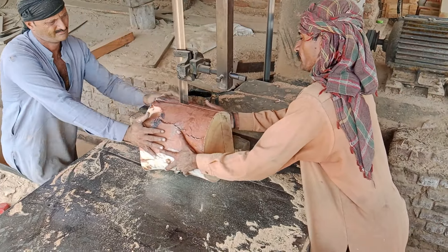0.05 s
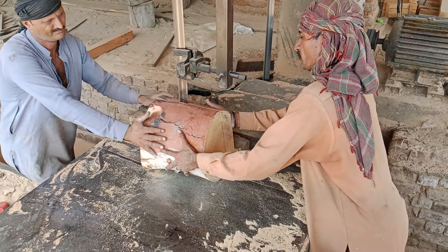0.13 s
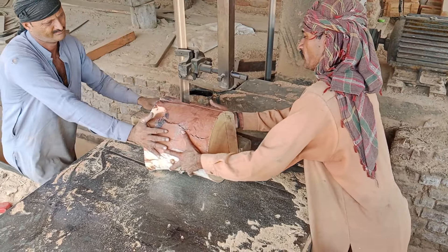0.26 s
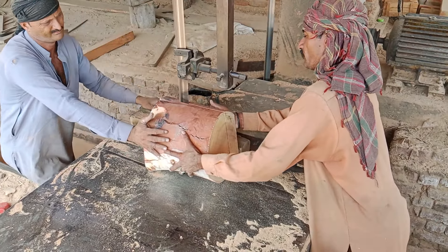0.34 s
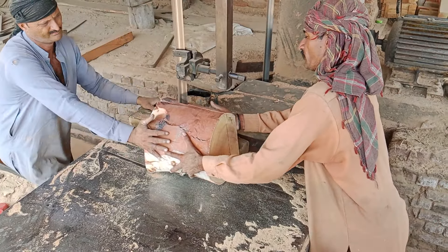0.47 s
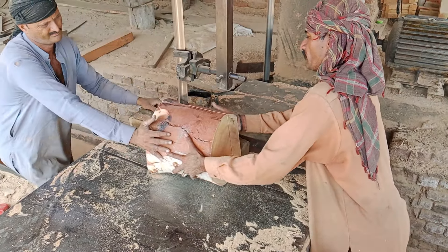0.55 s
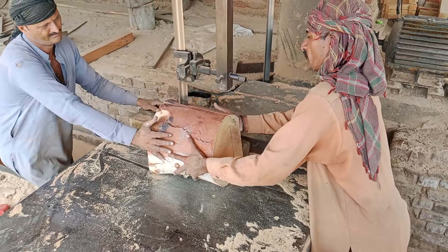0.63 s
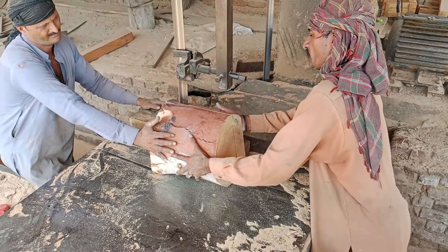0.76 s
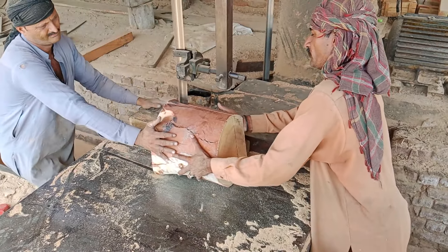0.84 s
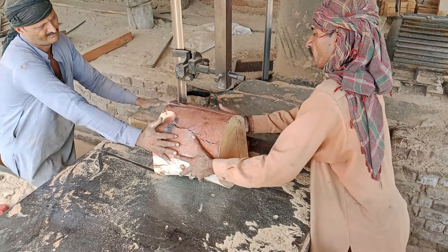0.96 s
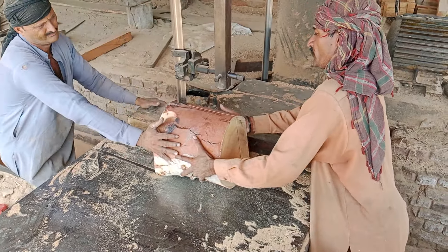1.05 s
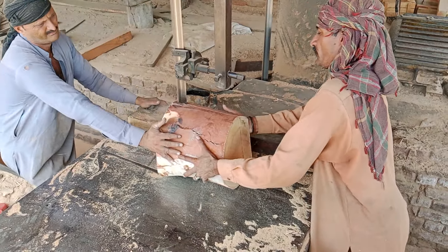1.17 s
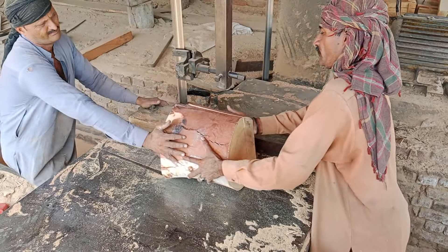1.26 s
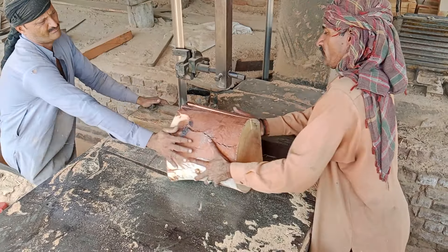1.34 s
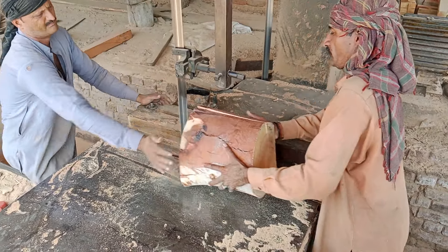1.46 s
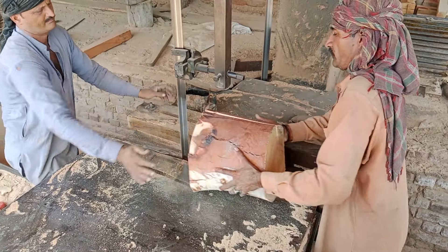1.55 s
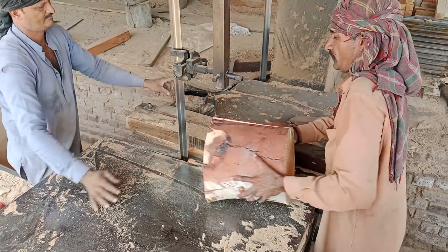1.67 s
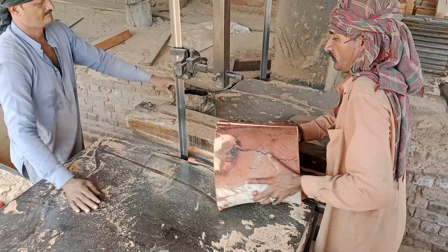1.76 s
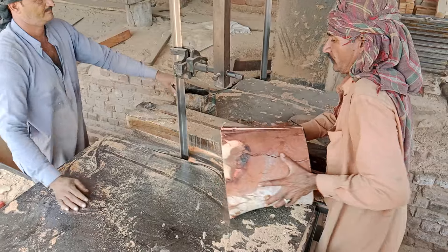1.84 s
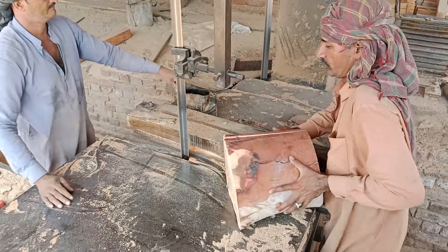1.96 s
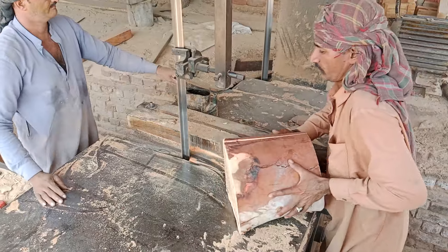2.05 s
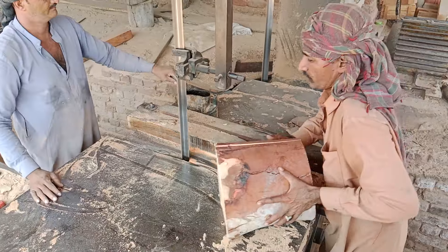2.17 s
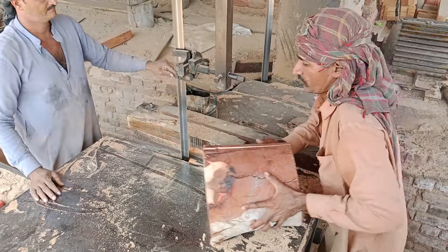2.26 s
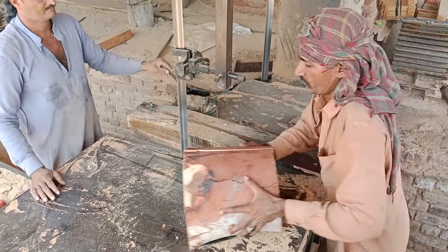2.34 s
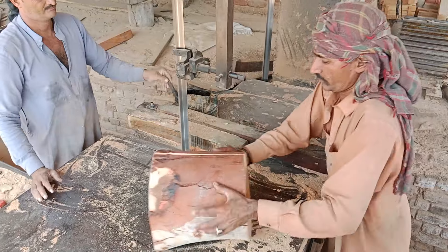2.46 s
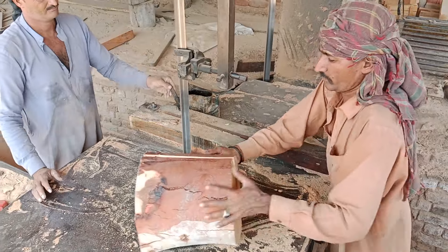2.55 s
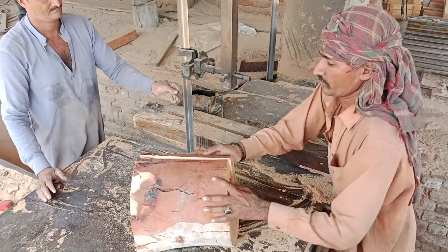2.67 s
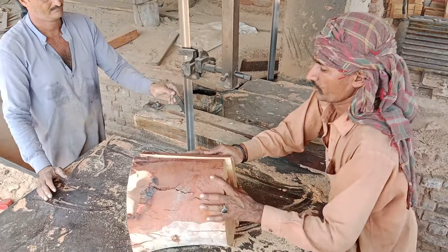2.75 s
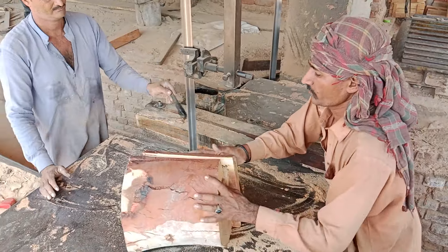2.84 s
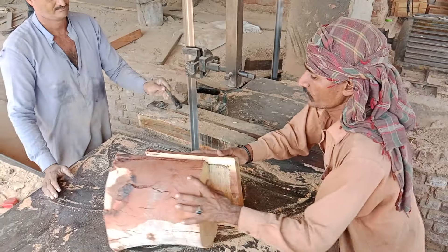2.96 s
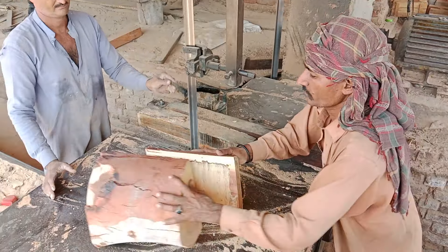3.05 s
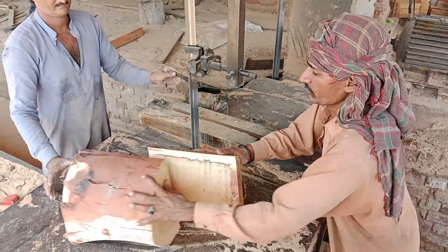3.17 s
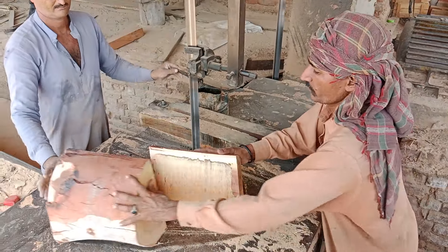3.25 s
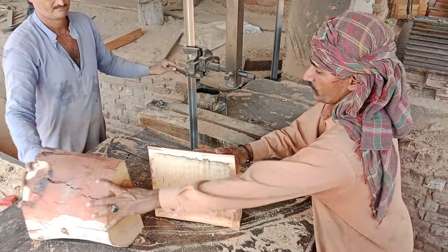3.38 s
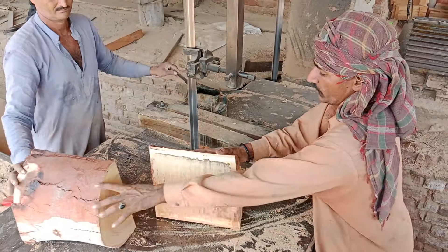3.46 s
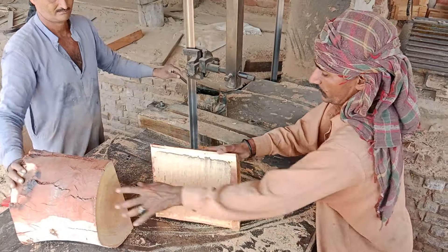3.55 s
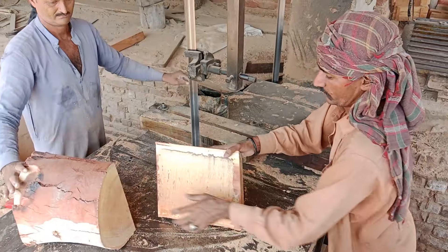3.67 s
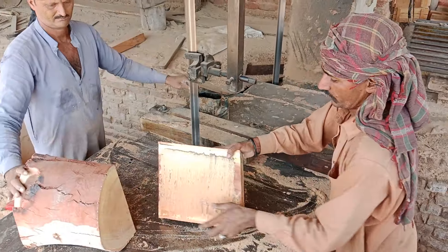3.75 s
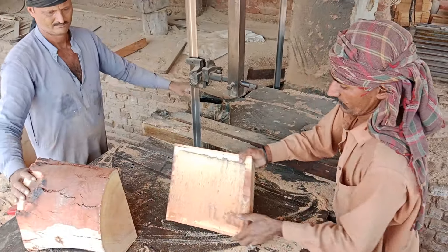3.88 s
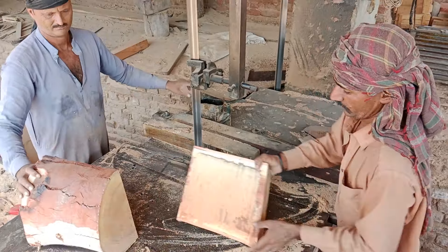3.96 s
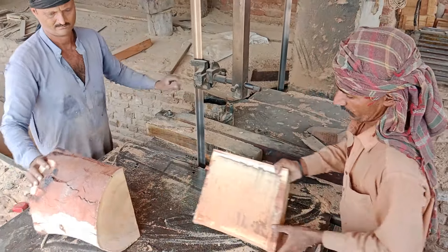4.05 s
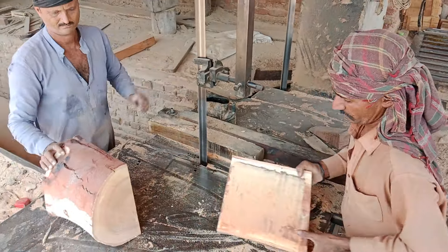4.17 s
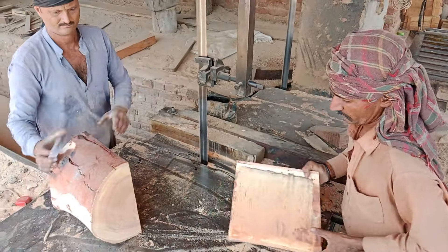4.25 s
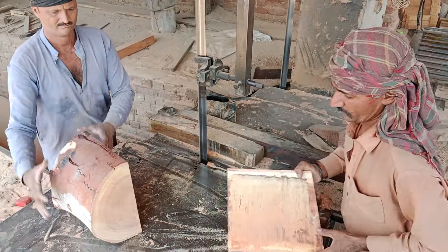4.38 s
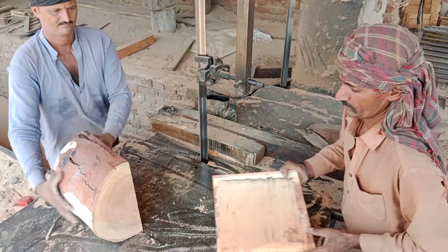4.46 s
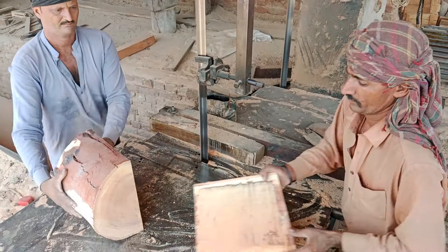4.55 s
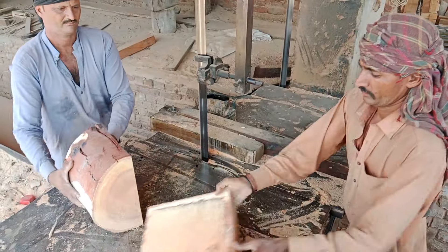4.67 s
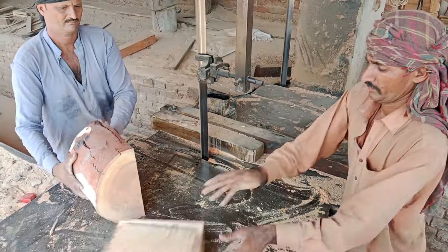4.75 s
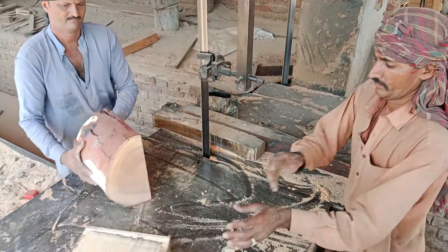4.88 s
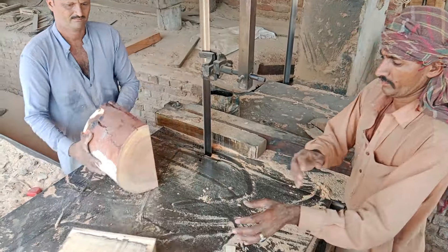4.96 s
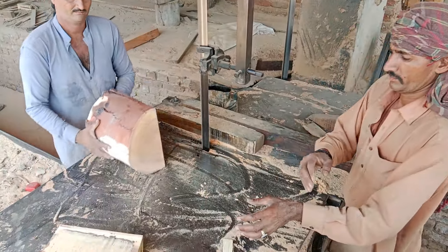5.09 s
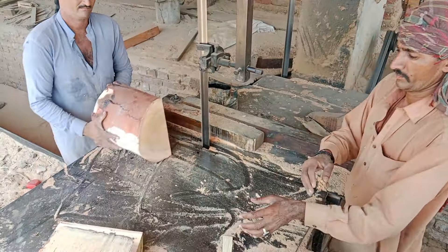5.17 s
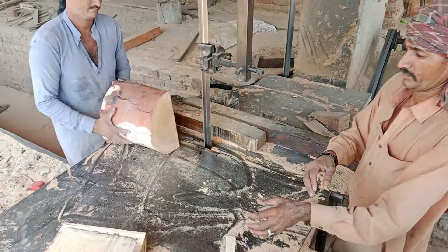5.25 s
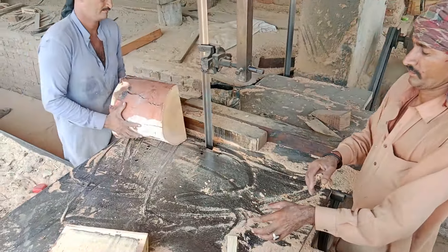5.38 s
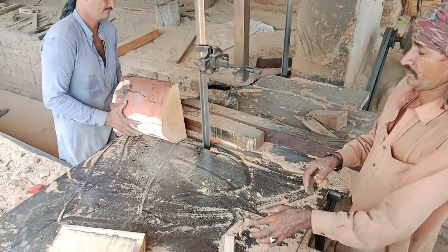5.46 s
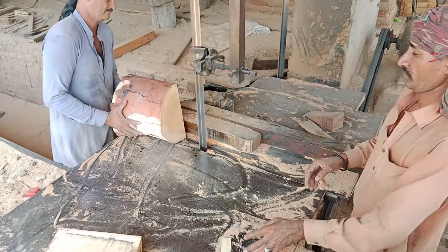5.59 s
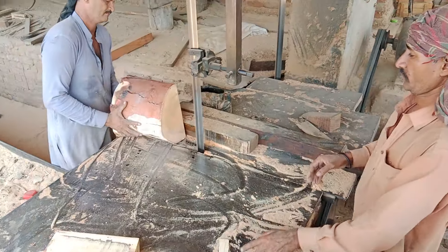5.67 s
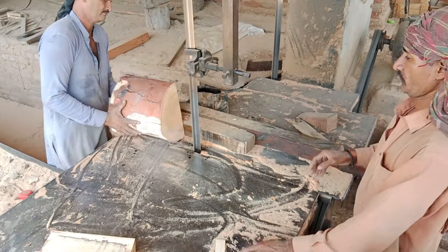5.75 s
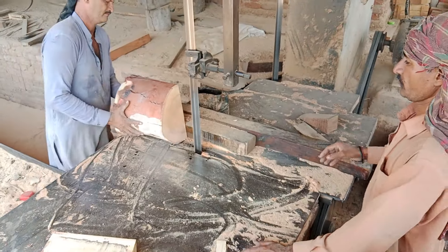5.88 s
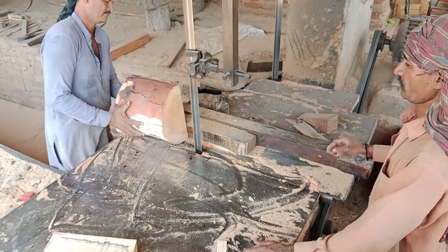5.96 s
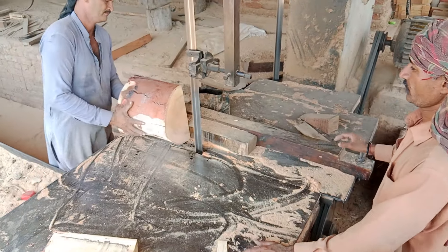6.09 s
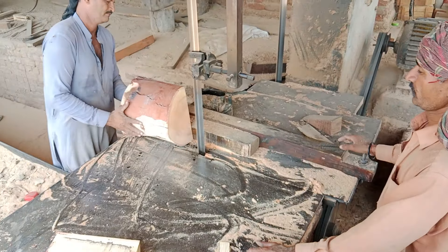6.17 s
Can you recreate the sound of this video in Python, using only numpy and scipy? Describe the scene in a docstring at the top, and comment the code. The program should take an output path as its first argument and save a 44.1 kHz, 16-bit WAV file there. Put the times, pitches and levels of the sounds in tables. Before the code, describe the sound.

From the start a large band saw cuts through a log, with a bright rasp and a high whine that sinks slightly in pitch and is strongest just before 1 second. At about 1.3 seconds the wood knocks lightly twice on the saw table and the rasp stops abruptly as the blade breaks out. The saw speeds up a little and runs free to the end, at about 6 seconds: a steady, high metallic hiss with thin, fluttering ringing, over a soft wheel roar and an uneven low rumble. A fine crunch of sawdust comes in around 1.8 seconds and slowly fades. At about 4.8 seconds a wooden slab drops close to the microphone with a quick clatter of several knocks, the loudest sound, briefly distorting and settling by 5 seconds. The hard walls of the workshop add a short, tight echo.

```python
"""A big band saw rips a slab off a hand-fed log, its teeth whining and rasping as the load slows it.
At 1.3 s the blade breaks out and wood knocks on the saw table. The band speeds up and runs free,
hissing through its guides, crunching sawdust and ringing in its cross modes over the rumble of frame
and wheels. At 4.8 s the slab is dropped near the microphone and overloads it.
A hard-walled workshop surrounds it all."""
import sys
import numpy as np
from scipy import signal
from scipy.fft import rfft, irfft
from scipy.io import wavfile
from scipy.ndimage import map_coordinates

SR = 44100
rng = np.random.default_rng(int(sys.argv[2]) if len(sys.argv) > 2 else 0)


def file_out(sig):
    """Save sig as 16-bit WAV at sys.argv[1]."""
    # one column per channel
    cols = np.atleast_2d(sig).T
    # limit, then scale
    lim = np.clip(cols, -1, 1)
    pcm = np.round(lim * 32767).astype(np.int16)
    wavfile.write(sys.argv[1], SR, pcm)


N = 274302
TIME = np.arange(N) / SR
FREQ = np.maximum(np.arange(N // 2 + 1) * SR / N, 1)

# Band rubbing in its guides. Each row: time in seconds, level in dB.
RUB_LEVEL = [(0, -24.5), (1.3, -22.5), (1.8, -21.5), (2.2, -20.5), (3.1, -22), (4.5, -21.5), (6.2, -20.5)]
# Guide hiss. Each row: frequency in Hz, relative level in dB.
RUB_SPECTRUM = [(1200, -42), (1800, -20.5), (2100, -13), (2350, -18.5), (3000, -13.5), (3700, -11),
                (4200, -8.5), (5300, -3.5), (6400, -1), (7200, -4), (7900, -15), (10500, -31.5),
                (12200, -29.5), (14200, -16.5), (15700, -23)]
# Upper cross modes. Each row: cut-on in Hz, edge width in Hz, tail width in Hz, relative level in dB.
UPPER_CROSS_MODES = [(6706, 22, 380, 9), (12440, 65, 1200, -15.5)]

def guide_rub(tooth_hz):
    """The band scrapes through its guides, pressed a little harder once per wheel turn."""
    teeth_per_turn = 222
    turn = np.sin(2 * np.pi * np.cumsum(tooth_hz / teeth_per_turn) / SR)
    # Out of the log, the slack band takes a moment to bear on its guides again.
    slack_db = -3 * (TIME > EXIT_S) * bump(EXIT_S, half_s=0.12)
    level_db = curve(RUB_LEVEL)[0] + slack_db + 0.28 * walk(11)
    hiss = noise() * undb(.5 * turn + 0.6 * walk(32) + 1.0 * walk(1200))
    scrape = noise() * undb(0.21 * turn + 1.1 * walk(40))
    modes = sum(cross_mode(*mode) for mode in UPPER_CROSS_MODES)
    steel = irfft(rfft(hiss) * colour(RUB_SPECTRUM) + rfft(scrape) * modes, N)
    return undb(level_db) * unit(steel)

# Lowest cross mode. One row: cut-on in Hz, edge width in Hz, tail width in Hz, relative level in dB.
SING_MODE = (2526, 16, 188, 0)
# Its strength. Each row: time in seconds, level in dB.
SING_LEVEL = [(0, -36.5), (1.0, -37), (1.6, -34.3), (2.9, -34.5), (3.6, -35), (4.3, -36), (5.4, -32.5),
              (6.2, -36)]
# Its flare-ups. Each row: peak time in seconds, gain in dB, half length in seconds.
SING_FLARES = [(1.777, 4, 0.018), (2.463, 2, 0.023), (2.816, 8, .02), (3.145, 3.5, .03), (3.853, 4, .02),
               (5.46, 3.5, 0.034)]

def band_sing():
    """The steel band rings in its lowest cross mode, fluttering and flaring up."""
    flares_db = sum(db * bump(peak_s, half_s) for peak_s, db, half_s in SING_FLARES)
    level_db = curve(SING_LEVEL)[0] + .9 * walk(7.6) + flares_db
    return undb(level_db) * shaped(noise(), cross_mode(*SING_MODE))

# Passing teeth. Each row: time in seconds, tooth rate in Hz, whine level in dB.
TOOTH_TRACK = [(0, 2340, -48), (.25, 2318, -49), (.5, 2282, -45), (.68, 2265, -37), (.88, 2243, -34),
               (1.0, 2223, -42), (1.15, 2183, -44), (1.31, 2210, -42), (1.6, 2330, -50), (2.2, 2440, -50)]
# Lines from teeth set in fours. Each row: frequency in quarters of the tooth rate, level in dB.
TOOTH_LINES = [(8, -39), (9, -39), (10, -39), (11, -30.5), (12, -30), (13, -41), (20, -53), (23, -42),
               (24, -38), (25, -52), (27, -40)]
# How hard the teeth bite. Each row: time in seconds, gain on the whole cut in dB.
BITE_GAIN = [(0, -3), (.3, -2), (.47, -0.3), (.57, -1.5), (.9, -0.5), (1.15, -3), (1.29, 0.5)]
# Tearing fibres. Each row: frequency in Hz, relative level in dB.
RASP_SPECTRUM = [(1200, -24.5), (3000, -12), (4500, -7), (5700, 1), (6550, 2.5), (6900, 13), (7250, 7),
                 (7800, -7.5), (9000, -17), (10500, -26), (12200, -17), (12700, -10), (13700, 3.5),
                 (15700, -8.5)]
# Log resonances. Each row: frequency in Hz, width in Hz, relative level in dB.
LOG_MODES = [(545.7, 15, 0.5), (660, 7.9, 1.5), (752, 9.7, 2), (910, 17, -2), (1033, 20, -0.5),
             (1097, 24, -3.5)]
EXIT_S, RELEASE_DB_PER_S = 1.312, 1100  # the blade breaks out of the log

def cut(tooth_hz, whine_db):
    """Teeth strike the wood in a whine, tear fibres in a bright rasp and shake the log."""
    bite = undb(curve(BITE_GAIN)[0] - RELEASE_DB_PER_S * np.clip(TIME - EXIT_S, 0, 1))
    # Unevenness repeats every dozen teeth: faint lines that sink with the band's speed.
    pattern = rng.standard_normal(228)
    travel_samples = np.cumsum(tooth_hz) / tooth_hz[0] + 0.84 * walk(40)
    uneven = map_coordinates(pattern, [travel_samples], order=3, mode="grid-wrap")
    tearing = (noise() + 0.45 * uneven) * undb(1.0 * walk(20) + 1.7 * walk(700))
    rasp = undb(-19.5) * shaped(tearing, colour(RASP_SPECTRUM))
    whine = undb(whine_db) * tone(tooth_hz, rough=0.32)
    # Timing jitter blurs the high lines most.
    overtones = sum(undb(db) * tone(round(k) * tooth_hz / 4, rough=k / 18) for k, db in TOOTH_LINES)
    # Slower beats of the tooth pattern sweep through the log's resonances.
    beats = tone(tooth_hz / 2, rough=.4) + tone(tooth_hz / 3, rough=.4)
    log = undb(-34) * shaped(noise() + 0.018 * beats, resonances(LOG_MODES))
    return bite * (rasp + whine + overtones + log)

# Wood striking the table. Each row: start in seconds, relative level in dB, contact time in ms.
BLOWS = [(1.262, -13, 2.4), (1.307, -16, 1.5), (4.799, 2, 2.6), (4.8565, 5.5, 0.31), (4.863, 1, 0.76),
         (4.869, 11.5, 4.2), (4.958, 3, 3.4), (5.0, -9, 4.6)]
# Slab and table together. Each row: frequency in Hz, relative level in dB, T60 in seconds.
SLAB_TABLE_MODES = [(132, -13, 0.21), (167.3, -3.5, 0.144), (192.3, -2, 0.09), (247, -5.5, 0.093),
                    (321.5, -4, 0.11), (436.5, -16, .08), (519, -8, 0.075), (643, -2, 0.038),
                    (740, -10.5, 0.1), (840, 4, 0.049), (910, -7, 0.1), (1045, -15, 0.079),
                    (1170, -18, .08), (1900, -28, 0.021), (2470, -6, 0.033)]

def knocks():
    """Each blow rings slab and table; a longer contact gives a duller thud."""
    out, t = np.zeros(N + SR), TIME[:SR // 2]
    hz, mode_db, t60_s = np.transpose(SLAB_TABLE_MODES)[:, :, None]
    crack_t60_s, clack_t60_s = 0.0093, 0.066
    crowded_modes = noise_band(hz=740, width_hz=256)
    scatters_db = 4.1 * rng.standard_normal((len(BLOWS), len(SLAB_TABLE_MODES), 1))
    for (start_s, db, contact_ms), scatter_db in zip(BLOWS, scatters_db):
        start = int(start_s * SR)
        span = slice(start, start + len(t))
        # Cosines: pressure follows the wood's acceleration, so it carries no net push.
        ring = np.sum(undb(mode_db + scatter_db - 60 * t / t60_s) * np.cos(2 * np.pi * hz * t), axis=0)
        crack = undb(14.5 - 60 * t / crack_t60_s) * noise()[:len(t)]
        clack = undb(10.5 - 60 * t / clack_t60_s) * crowded_modes[span]
        force = np.exp(-.5 * ((t[:600] * 1000 - contact_ms) / (contact_ms / 4)) ** 2)
        blow = signal.fftconvolve(ring + crack + clack, force / force.sum())[:len(t)]
        out[span] += undb(db - 18.5) * blow
    return out[:N]

# Passing notes. Each row: start and end in seconds, frequency in Hz, level in dB, roughness 0-1.
RING_NOTES = [(0.23, 0.623, 655, -35.5, 0.3), (0.764, .9, 5070, -36.5, 0.4), (1.037, 1.193, 1097, -32, 0.4),
              (0.948, 1.44, 2753, -34.5, 0.66), (1.22, 1.54, 620, -44, 0.3), (1.4, 2.26, 1000, -46, 0.4),
              (2.73, 3.84, 587, -41.5, 0.74), (3.7, 5.7, 741, -43.5, 0.85)]

def rings():
    """Steel and wood take up single notes that swell, flutter and die away."""
    out = np.zeros(N)
    for start_s, end_s, hz, db, rough in RING_NOTES:
        swell = np.sin(np.pi * np.clip((TIME - start_s) / (end_s - start_s), 0, 1))
        out += undb(db) * swell * tone(np.full(N, hz), rough)
    return out

# Sawdust crunch. Each row: time in seconds, level in dB.
DUST_LEVEL = [(1.4, -55), (1.8, -35), (2.3, -37.5), (3.3, -39.5), (3.8, -44), (4.5, -39.5), (5.4, -43),
              (6.2, -48)]

def sawdust():
    """Grains carried round by the band are crushed in the guides in uneven spurts."""
    grains = noise() * undb(2.9 * walk(17) + 2.0 * walk(900))
    return undb(curve(DUST_LEVEL)[0]) * shaped(grains, resonances([(14330, 1600, 0)]) ** 2)

# Wheel roar. Each row: frequency in Hz, relative level in dB.
WHEEL_SPECTRUM = [(100, -22), (390, -30), (470, -6.5), (600, -1.5), (800, -1), (900, 1.5), (1080, -5.5),
                  (1200, -12.5), (1500, -9), (1750, -4.5), (2400, -18.5), (5000, -52)]
# Housing resonances. Each row: frequency in Hz, width in Hz, relative level in dB.
HOUSING_MODES = [(580, 34, -9.5), (627, 31, -4), (758, 33, -4.5), (849.3, 10, 9.5), (890, 10.5, 7),
                 (1064, 30, 1), (1786, 24, -10)]

def wheels():
    """The wheels roar and ring their housing, where a low, breathy moan waxes and wanes."""
    roar = undb(-36.5 + 1.5 * walk(32)) * shaped(noise(), colour(WHEEL_SPECTRUM))
    moan_peak_s, moan_period_s = 1.97, 1.105
    moan_db = -60 + 8 * np.cos(2 * np.pi * (TIME - moan_peak_s) / moan_period_s)
    moan = undb(moan_db) * noise_band(hz=385.6, width_hz=81)
    housing = undb(-41.5) * shaped(noise(), resonances(HOUSING_MODES))
    return roar + moan + housing

# Frame rumble. Each row: frequency in Hz, relative level in dB.
FRAME_SPECTRUM = [(25, -26), (45, -13), (70, -15), (110, -8), (135, -2), (175, 1.5), (215, -6), (255, -4.5),
                  (280, -4.5), (320, -7.5), (360, -29), (600, -54)]
# Its swells. Each row: peak time in seconds, level in dB.
FRAME_SWELLS = [(.14, -43.5), (.27, -41.5), (.85, -45), (1.59, -42), (1.85, -44), (2.409, -48),
                (2.929, -39.5), (3.24, -44), (3.36, -40), (3.56, -45), (3.74, -39), (4.04, -41), (4.4, -42),
                (4.7, -42), (5.92, -45), (6.08, -49)]

def frame_rumble():
    """The frame throbs and shakes unevenly, swelling as the wood is shifted about."""
    throb_hz, throb_peak_s, rise_db_per_s = 2.23, 0.25, 1.34
    throb_db = 0.5 * np.cos(2 * np.pi * throb_hz * (TIME - throb_peak_s))
    idle = undb(-57.5 + rise_db_per_s * TIME + throb_db + 4 * walk(8))
    swells = sum(undb(db) * bump(peak_s, half_s=0.056) for peak_s, db in FRAME_SWELLS)
    return np.hypot(idle, swells) * shaped(noise(), colour(FRAME_SPECTRUM))

# Saw table resonances, applied twice. Each row: frequency in Hz, width in Hz, relative gain in dB.
DRONE_RESONANCES = [(225.5, 57, 0.5), (307.5, 23, -4)]
# Table drone. Each row: time in seconds, level in dB.
DRONE_LEVEL = [(0, -58), (.6, -64), (1.4, -44.5), (2.1, -55.5), (2.6, -54), (4.1, -50.5), (5.45, -48),
               (6.2, -51.5)]

def table_drone():
    """The saw table resonates with a hollow drone."""
    return undb(curve(DRONE_LEVEL)[0]) * shaped(noise(), resonances(DRONE_RESONANCES) ** 2)

def workshop(x, t60_s, wet_db):
    """Direct sound and a short, dense echo from the walls."""
    t = TIME[:SR]
    tail = rng.standard_normal(SR) * undb(-60 * t / t60_s) * (t > .006)
    return x + undb(wet_db) * signal.fftconvolve(x, tail / np.linalg.norm(tail))[:N]

def cross_mode(hz, edge_hz, tail_hz, db):
    """A long strip has no waves below a mode's cut-on and a crowd of them just above."""
    edge = (1 + np.tanh((FREQ - hz) / (2 * edge_hz))) / 2
    tail = np.exp(-np.maximum(FREQ - hz, 0) / tail_hz)
    return undb(db) * edge * tail

def resonances(modes):
    """Response of a few damped resonances."""
    return sum(undb(db) / (1 + 1j * (FREQ / hz - hz / FREQ) * hz / width) for hz, width, db in modes)

def colour(points):
    """Gain at every frequency from (Hz, dB) points."""
    hz, db = np.transpose(points)
    return undb(np.interp(np.log(FREQ), np.log(hz), db))

def shaped(x, response):
    """Filter by a response; rms 1."""
    return unit(irfft(rfft(x) * response, N))

def tone(hz, rough):
    """A line of rms near 1 whose phase and strength flutter."""
    phase = 2 * np.pi * np.cumsum(hz) / SR + rough * walk(48)
    return np.sqrt(2) * np.sin(phase) * (1 + .5 * rough * walk(33))

def noise():
    """White noise."""
    return rng.standard_normal(N)

def noise_band(hz, width_hz):
    """Noise passed twice through one resonance; rms 1."""
    return shaped(noise(), resonances([(hz, width_hz, 0)]) ** 2)

def walk(rate_hz):
    """Smooth random wander; rms 1."""
    return shaped(noise(), np.exp(-(FREQ / rate_hz) ** 2))

def curve(rows):
    """One signal for each column after the time column."""
    times_s, *columns = np.transpose(rows)
    return [np.interp(TIME, times_s, column) for column in columns]

def bump(peak_s, half_s):
    """A smooth rise and fall."""
    return np.exp(-((TIME - peak_s) / half_s) ** 2)

def undb(db):
    """Decibels to gain."""
    return 10 ** (np.asarray(db) / 20)

def unit(x):
    """Scale to rms 1."""
    return x / np.sqrt(np.mean(x ** 2))

def scene():
    """Saw and wood in the workshop, the same in both channels."""
    tooth_hz, whine_db = curve(TOOTH_TRACK)
    blade = guide_rub(tooth_hz) + band_sing() + cut(tooth_hz, whine_db) + sawdust() + rings()
    machine = frame_rumble() + table_drone() + wheels()
    return np.tile(workshop(blade + machine + knocks(), t60_s=0.19, wet_db=-11), (2, 1))

def record(dry):
    """Shed the deep bass, clip the loudest peaks and cut the top."""
    bass_hz, ceiling, top_hz = 88, .46, 15750
    thin = signal.sosfilt(signal.butter(3, bass_hz, "high", fs=SR, output="sos"), dry)
    clipped = np.clip(thin, -ceiling, ceiling)
    return signal.sosfiltfilt(signal.ellip(12, .1, 60, top_hz, fs=SR, output="sos"), clipped)

dry = scene()
out = record(dry)
file_out(out)
```